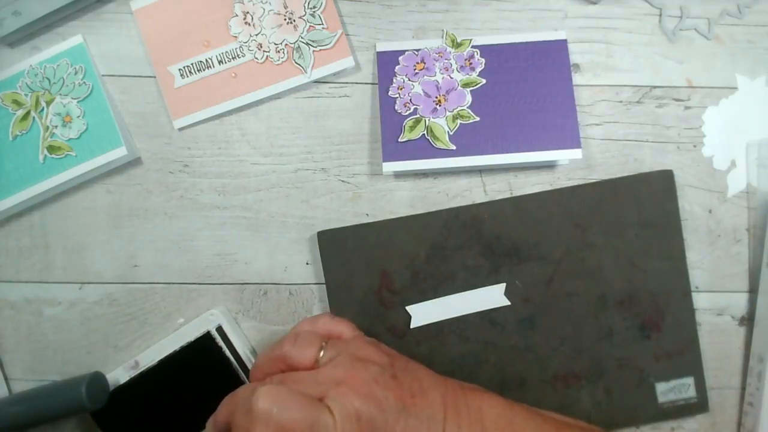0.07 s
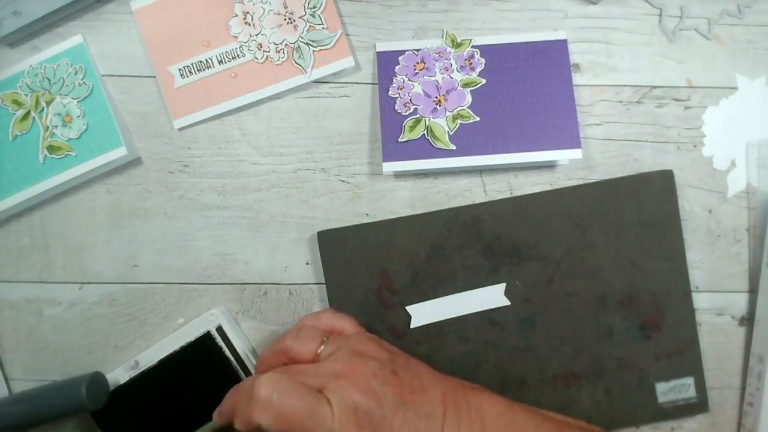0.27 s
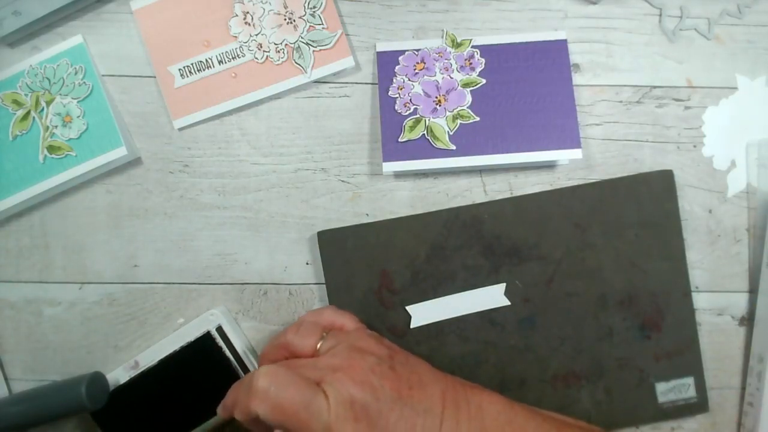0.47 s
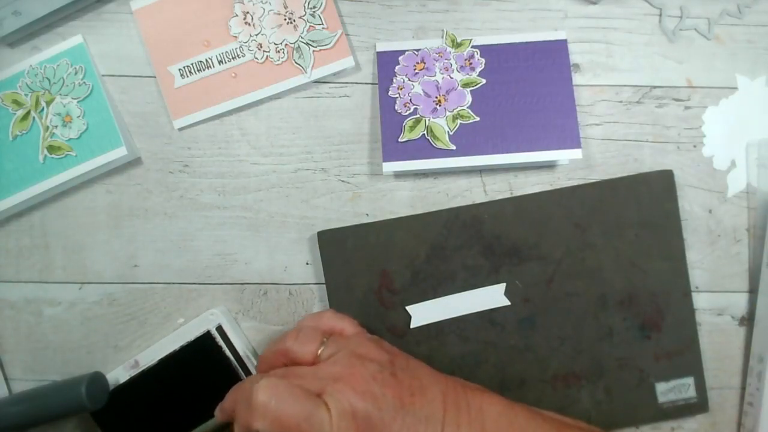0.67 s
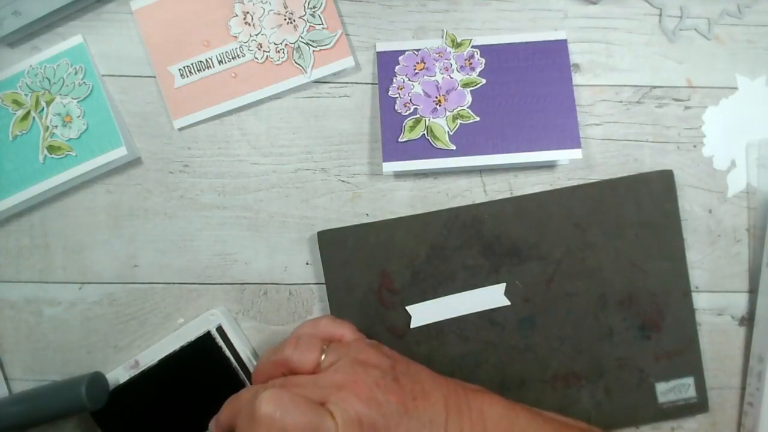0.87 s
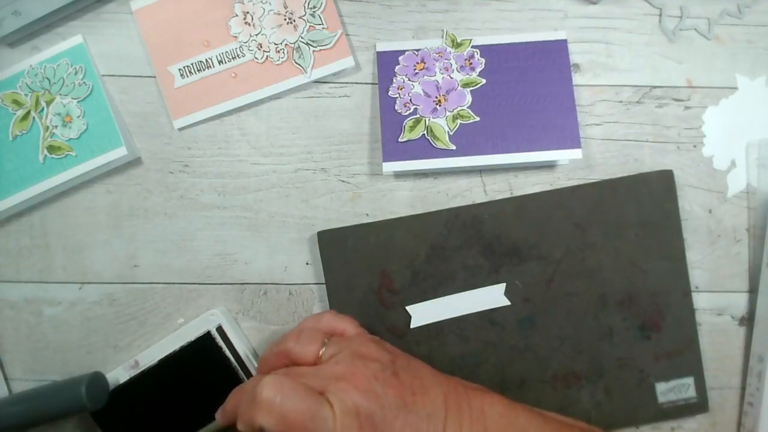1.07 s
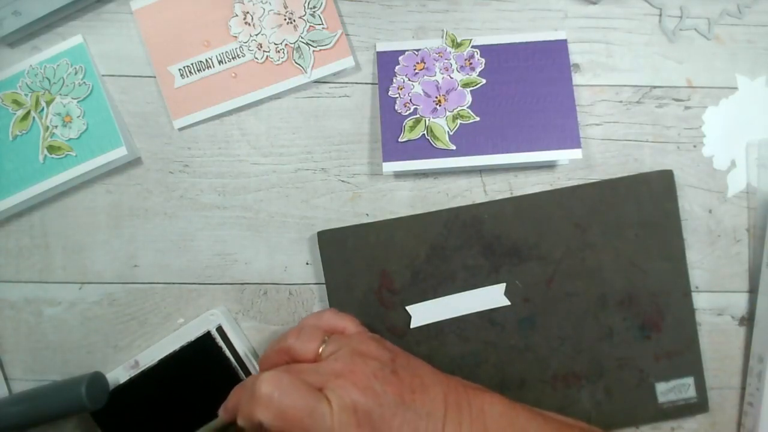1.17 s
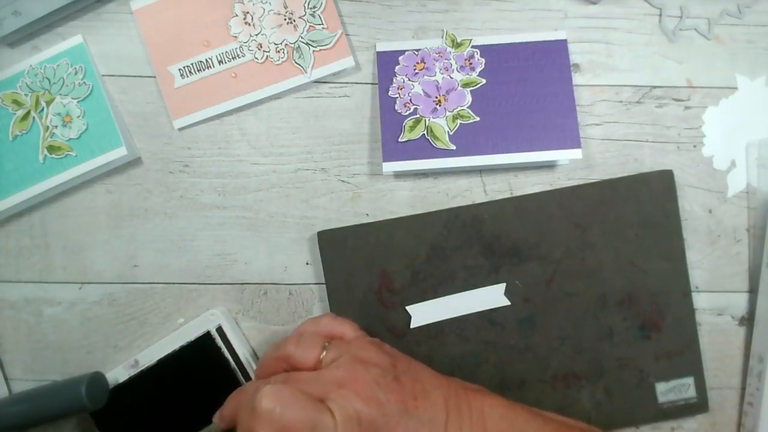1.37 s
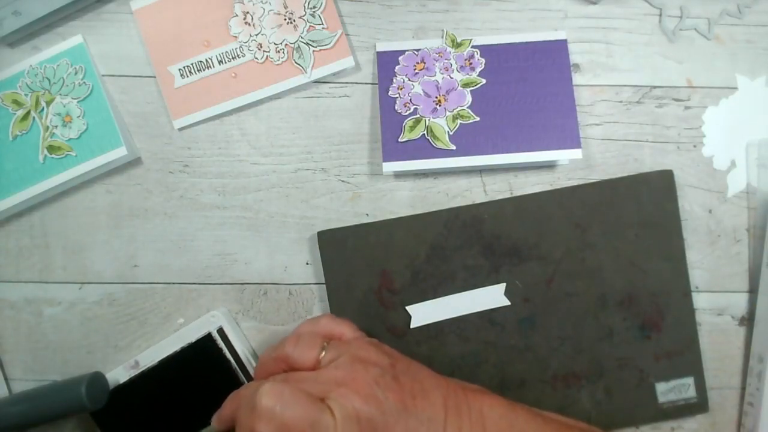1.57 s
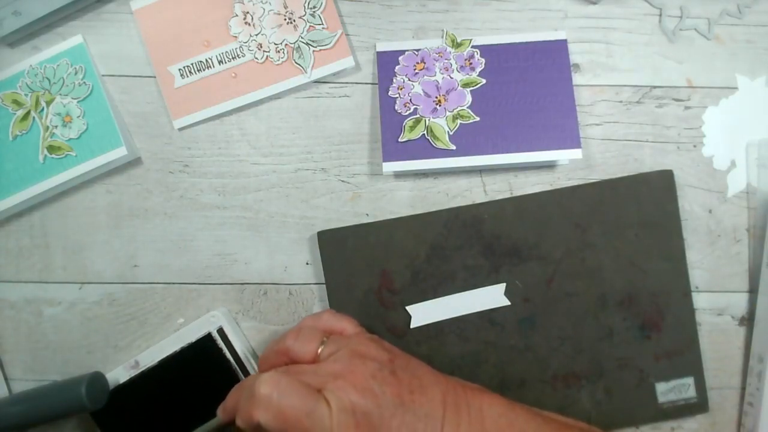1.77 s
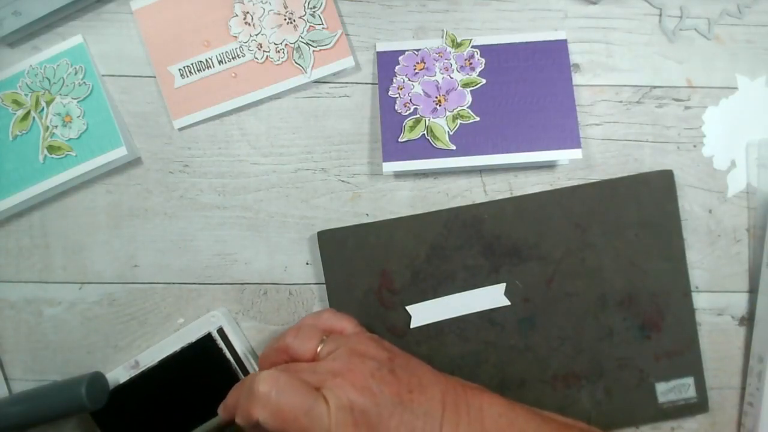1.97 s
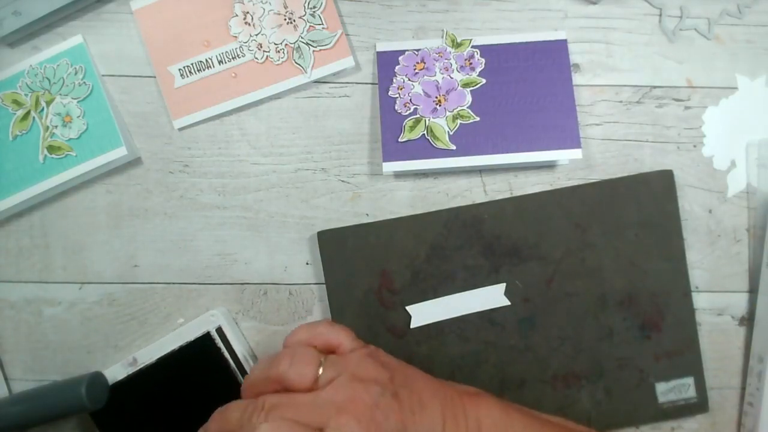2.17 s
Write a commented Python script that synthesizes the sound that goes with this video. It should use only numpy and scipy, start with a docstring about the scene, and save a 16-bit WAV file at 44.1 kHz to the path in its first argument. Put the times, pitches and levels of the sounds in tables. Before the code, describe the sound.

Slow plastic clacks of a stamp block against an ink pad, thudding through a tabletop, close

```python
"""An acrylic stamp block is tapped on an ink pad that lies on a craft table, in a small quiet room.
Each tap is a clack (two snaps, noisy chatter, ringing case modes, room tail) over the tabletop's modal thump.
Slow pushes rock the same table modes into soft bumps; shaped noise makes the pad's rustle and hand swishes.
Steady noise gives hiss and rumble, under sines for a faint whine and a low hum that comes and goes."""
import sys
import numpy as np
from scipy import signal
from scipy.fft import irfft
from scipy.io import wavfile
from scipy.ndimage import uniform_filter1d

SR = 44100
rng = np.random.default_rng(int(sys.argv[2]) if len(sys.argv) > 2 else 0)


def unload_audio(sound):
    """Save the sound as a 16-bit wav file, at the path given as the first command line argument."""
    columns = np.transpose(np.atleast_2d(sound))
    # keep every value between -1 and 1, then stretch to whole-number steps
    steps = np.round(np.clip(columns, -1, 1) * 32767)
    wavfile.write(sys.argv[1], SR, steps.astype(np.int16))


N = 98519  # length in samples


def amp(db):
    """Decibels to gain."""
    return 10 ** (np.asarray(db) / 20)


def read(points, hz):
    """Reads a table at the given frequencies, interpolating on a log-frequency axis."""
    f, value = np.transpose(points)
    return np.interp(np.log(hz + 1), np.log(f + 1), value)


def add(mix, s, sound):
    """Mixes a sound in at time s, which may lie before the start."""
    at = round(s * SR)
    sound = sound[max(-at, 0):]
    part = mix[max(at, 0):][:len(sound)]
    part += sound[:len(part)]


def noise(spectrum, size):
    """Random-phase noise of rms 1; only the shape of the spectrum counts."""
    hz = np.fft.rfftfreq(size, 1 / SR)
    phase = 2 * np.pi * rng.random(len(hz))
    x = irfft(amp(read(spectrum, hz)) * np.exp(1j * phase), size)
    return x / x.std()


def ring(modes, t, sway_db=0):
    """Struck modes: sines that swing up and die away; the lowest can be given extra weight."""
    sway_below_hz = 70
    rise_cycles = 0.8  # time constant of the swing-up, in periods of the mode
    total = 0
    for hz, db, t60 in modes:
        level_db = db + sway_db * (hz < sway_below_hz)
        decay = amp(level_db - 60 * t / t60)
        rise = 1 - np.exp(-t * hz / rise_cycles)
        total = total + decay * rise * np.sin(2 * np.pi * hz * t)
    return total


def tabletop(t, sway_db=0):
    """The table is pushed down, hence the minus sign, and rings in its modes."""
    # tabletop modes: pitch_hz [Hz], level_db [dB, relative], t60_s [s]
    table_modes = [(49.3, -30.5, 0.39), (90.5, -30.5, .1), (125.9, -29.5, 0.44), (121.9, -25, 0.17),
                   (189.1, -38, 0.2), (239.7, -48, 0.27), (293.2, -22, .15), (312.8, -35, 0.15),
                   (394.8, -14.5, 0.039), (433.1, -24, 0.096), (449.8, -21, 0.08), (542, -39, 0.12),
                   (548.6, -29, 0.074), (603.3, -28, 0.094), (649, -31.5, 0.078)]
    return -ring(table_modes, t, sway_db)


def room(t):
    """Diffuse tail of a clack: noise whose bands decay at their own rates, the high treble fast."""
    # colour of the tail: freq_hz [Hz], density_db [dB per Hz, relative]
    tail_spectrum = [(100, 8.5), (300, 9.5), (600, -18.5), (800, -1.5), (1500, 2.5), (2200, -10),
                     (3400, -13.5), (4800, -24), (8500, -22.5), (11500, -29), (16000, -40)]
    # decay of the tail: freq_hz [Hz], t60_s [s]
    tail_t60 = [(100, 0.18), (500, 0.23), (1500, 0.14), (4000, .15), (9000, 0.097), (16000, .11)]
    level_db, rise_s = -33, 0.005
    hz, when, z = signal.stft(noise(tail_spectrum, len(t)), SR, nperseg=256)
    decay = amp(-60 * when / read(tail_t60, hz)[:, None])
    tail = signal.istft(z * decay, SR)[1][:len(t)]
    return amp(level_db) * tail * (1 - np.exp(-t / rise_s))


def click(spectrum, size):
    """One causal (minimum-phase) click of peak 1 with the given spectrum."""
    log_gain = np.log(amp(read(spectrum, abs(np.fft.fftfreq(size, 1 / SR)))))
    x = np.fft.ifft(np.exp(np.conj(signal.hilbert(log_gain)))).real
    return x / abs(x).max()


def soften(x, hz):
    """First-order roll-off of a cushioned contact."""
    r = np.exp(-2 * np.pi * hz / SR)
    return signal.lfilter([1 - r], [1, -r], x)


def taps():
    """The block lands: two snaps, brief chatter and case ring over the table's thump."""
    # landings, the first just before the start: start_s [s], thump_db [dB], clack_db [dB],
    # edge_hz [Hz, clack's roll-off], rim_db [dB, extra on the rim's ring]
    landings = [(-0.030, -2.5, -0.5, 3220, -4), (0.7564, -3.5, -1.5, 1610, -13.5),
                (1.4340, 0, 2, 5000, -2.5), (2.1526, 0, 2.5, 4830, 0)]
    # modes of block and pad case: pitch_hz [Hz], level_db [dB, relative], t60_s [s]
    case_modes = [(494, -15, 0.027), (802, -25, 0.021), (935.5, -20, 0.021), (1073, -30, 0.028),
                  (1142, -17, 0.021), (1230, -36, 0.047), (1346.5, -28.5, 0.039), (1574, -35.5, 0.068),
                  (1624, -34, .05), (1993, -33, 0.019), (2204, -33, .016), (2410, -41, 0.026),
                  (3133, -45, 0.038), (3277, -47.5, .035)]
    # modes in this range ring fully only when the block catches the rim squarely: low_hz, high_hz [Hz]
    rim_range = (1000, 1260)
    # the block meets the rim, then rocks onto its other edge: delay_s [s after contact], peak_db [dB]
    snap_hits = [(0.0, -31), (.0041, -24.5)]
    # colour of a snap: freq_hz [Hz], density_db [dB per Hz, relative]
    snap_spectrum = [(300, -7), (1200, -12.5), (2000, -5), (3500, -5), (4700, -12), (7000, -15), (9500, -8),
                     (12000, -25), (16000, -2)]
    # colour of the chatter: freq_hz [Hz], density_db [dB per Hz, relative]
    chatter_spectrum = [(300, -37), (700, -9), (1200, 8), (2000, 0), (3300, -12), (4200, -15.5),
                        (4700, -23), (7000, -23), (9300, -20), (11500, -38), (16000, -79)]
    chatter_db, chatter_hold_s, chatter_t60_s = -32, 0.0044, 0.0071
    foam_lead_s = 0.00086  # the foam starts to push the table before the hard contact

    out, t = np.zeros(N), np.arange(SR) / SR
    rim_modes = [mode for mode in case_modes if rim_range[0] < mode[0] < rim_range[1]]
    shell_modes = [mode for mode in case_modes if mode not in rim_modes]
    rim = ring(rim_modes, t)
    thump = tabletop(t)
    knock = ring(shell_modes, t) + room(t)
    snap = click(snap_spectrum, SR)
    for delay_s, peak_db in snap_hits:
        add(knock, delay_s, amp(peak_db) * snap)

    for start_s, thump_db, clack_db, edge_hz, rim_db in landings:
        fall_db = -60 * np.maximum(t - chatter_hold_s, 0) / chatter_t60_s
        chatter = noise(chatter_spectrum, SR) * amp(chatter_db + fall_db)
        clack = soften(knock + chatter + amp(rim_db) * rim, edge_hz)
        add(out, start_s - foam_lead_s, amp(thump_db) * thump)
        add(out, start_s, amp(clack_db) * clack)
    return out


def background():
    """Steady noise for hiss and rumble, with sines for a faint whine and a hum that swells and fades."""
    # colour of the hiss: freq_hz [Hz], density_db [dB per Hz, relative]
    hiss_spectrum = [(200, -9), (400, 0.5), (550, 4.5), (950, -4), (1100, -3), (1550, 2), (2200, -9.5),
                     (2900, -2.5), (3400, -12), (5000, -14.5), (7000, -24.5), (15500, -72.5)]
    # colour of the rumble: freq_hz [Hz], density_db [dB per Hz, relative]
    rumble_spectrum = [(20, -9.5), (50, 12.5), (90, -8.5), (130, 3), (200, -18), (300, -11.5), (400, -33.5),
                       (900, -39)]
    # steady electrical whine: pitch_hz [Hz], level_db [dB rms]
    whine_tones = [(500, -86), (798, -89.5), (1000, -93), (1200, -96), (1298, -90)]
    # swells of the low hum: time_s [s], level_db [dB rms]
    hum_levels = [(0, -54), (.19, -55.5), (.3, -68), (.42, -71), (.5, -105), (.72, -104), (.85, -60.5),
                  (.97, -61), (1.19, -53.5), (1.3, -69), (1.45, -92.5), (1.7, -85), (1.8, -61.5),
                  (2.0, -60.5), (2.23, -49)]
    hum_hz, hiss_db, rumble_db = 172.8, -76, -64
    t = np.arange(N) / SR
    whine = sum(amp(db) * np.sin(2 * np.pi * (hz * t + rng.random())) for hz, db in whine_tones)
    hum = amp(np.interp(t, *np.transpose(hum_levels))) * np.sin(2 * np.pi * hum_hz * t)
    hiss = amp(hiss_db) * noise(hiss_spectrum, N)
    rumble = amp(rumble_db) * noise(rumble_spectrum, N)
    return hiss + rumble + np.sqrt(2) * (whine + hum)  # sqrt(2) turns rms levels into sine peaks


def bumps():
    """Slow pushes rock the table without a clack, with a dull rustle from the pad."""
    # the block lifts or the hand touches down: start_s [s], level_db [dB],
    # push_s [s, 2 pi times the push's time constant], sway_db [dB, extra on the lowest table mode]
    pushes = [(0.374, -19, 0.0076, 11), (0.7163, -19, 0.0032, 0), (1.128, -20.5, 0.0067, 10.5),
              (1.341, -26, 0.0047, -12), (1.736, -21.5, 0.0081, 13)]
    # colour of the tacky pad letting go: freq_hz [Hz], density_db [dB per Hz, relative]
    peel_spectrum = [(60, -27), (200, -6), (320, 20.5), (420, -19.5), (600, -5.5), (800, -17),
                     (2000, -26.5), (8000, -42)]
    peel_db, peel_s = -38.5, 0.018  # level relative to the bump; time at which the rustle peaks
    out, t = np.zeros(N), np.arange(SR) / SR
    for start_s, level_db, push_s, sway_db in pushes:
        push = t * np.exp(-2 * np.pi * t / push_s)
        rock = signal.fftconvolve(tabletop(t, sway_db), push / push.sum())[:SR]
        swell = t / peel_s * np.exp(1 - t / peel_s)
        peel = amp(peel_db) * noise(peel_spectrum, SR) * swell
        add(out, start_s, amp(level_db) * (rock + peel))
    return out


def brushes():
    """Half-sine swells of noise as the hand comes down before a tap, and one small ringing graze."""
    # swishes of the hand: start_s [s], length_s [s], level_db [dB rms before the swell]
    swishes = [(0.707, 0.046, -74), (1.367, .06, -70), (2.085, .07, -66)]
    # colour of a swish: freq_hz [Hz], density_db [dB per Hz, relative]
    swish_spectrum = [(200, 3), (900, -1.5), (2000, -12), (4000, -12), (9000, -19), (15000, -26)]
    # the block grazes the pad's rim before the last tap: start_s [s], pitch_hz [Hz], level_db [dB], t60_s [s]
    rim_graze = (2.1085, 840, -53, .03)
    out = np.zeros(N)
    for start_s, length_s, level_db in swishes:
        size = round(length_s * SR)
        swell = np.sin(np.pi * np.arange(size) / size)
        add(out, start_s, amp(level_db) * noise(swish_spectrum, size) * swell)
    start_s, pitch_hz, level_db, t60_s = rim_graze
    add(out, start_s, ring([(pitch_hz, level_db, t60_s)], np.arange(SR) / SR))
    return out


def scene():
    """Everything summed as heard by one microphone."""
    return (taps() + background() + bumps() + brushes())[None]


def suppress(x):
    """Noise suppressor: turns the bass down smoothly as its short-term power sinks under a threshold."""
    below_hz, threshold_db, depth_db, smooth_s = 390, -65.5, -9, 0.043
    bass = signal.sosfiltfilt(signal.butter(2, below_hz, fs=SR, output="sos"), x)
    power = abs(uniform_filter1d(bass ** 2, round(smooth_s * SR)))
    shut = 1 / (1 + (power / amp(threshold_db) ** 2) ** 2)  # 0 open, 1 fully turned down
    return x + bass * (amp(depth_db * shut) - 1)


def record(dry):
    """The microphone's low cut, the noise suppressor and the recorder's band limit."""
    low_cut_hz, top_edge_hz = 27, 15750
    low_cut = signal.butter(2, low_cut_hz, "high", fs=SR, output="sos")
    cleaned = suppress(signal.sosfilt(low_cut, dry))
    band_limit = signal.firwin(255, top_edge_hz, window=("kaiser", 9), fs=SR)
    return signal.oaconvolve(cleaned, band_limit[None], "same")


dry = scene()
out = record(dry)
unload_audio(out)
```